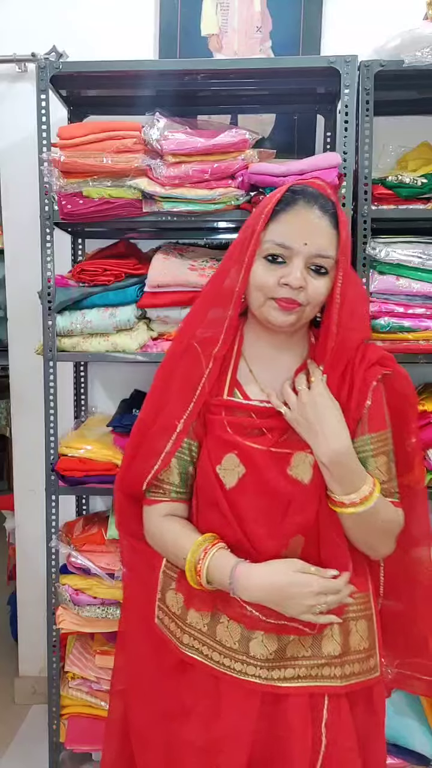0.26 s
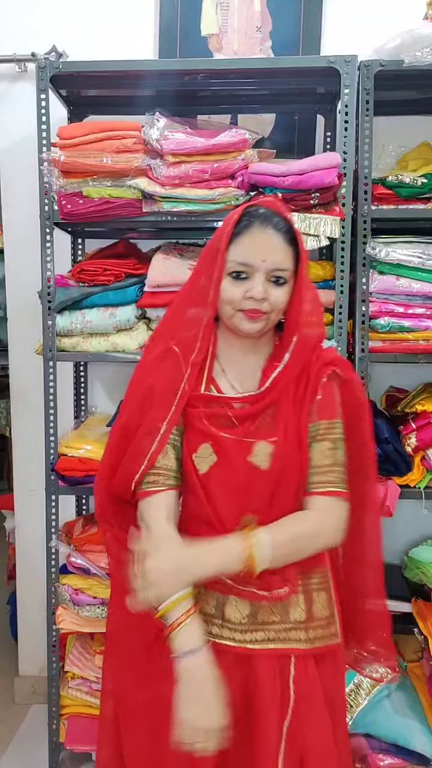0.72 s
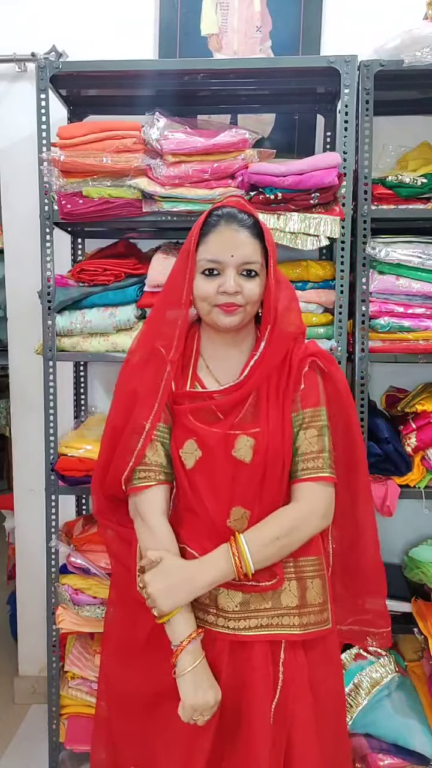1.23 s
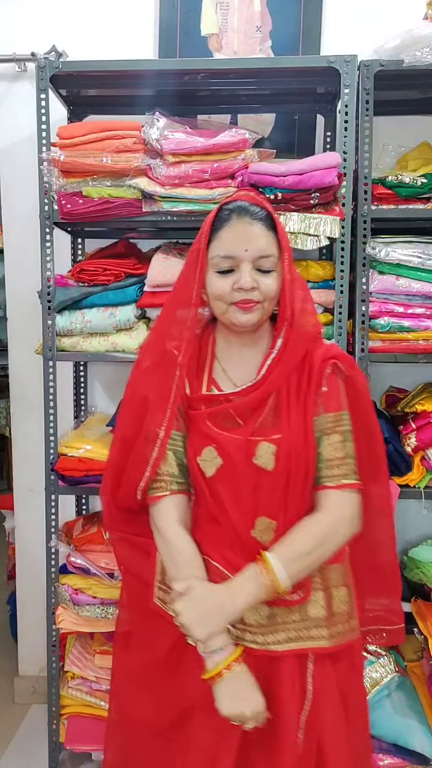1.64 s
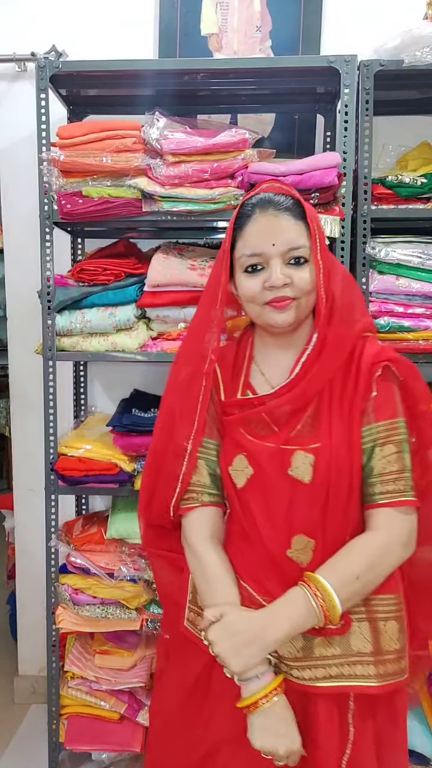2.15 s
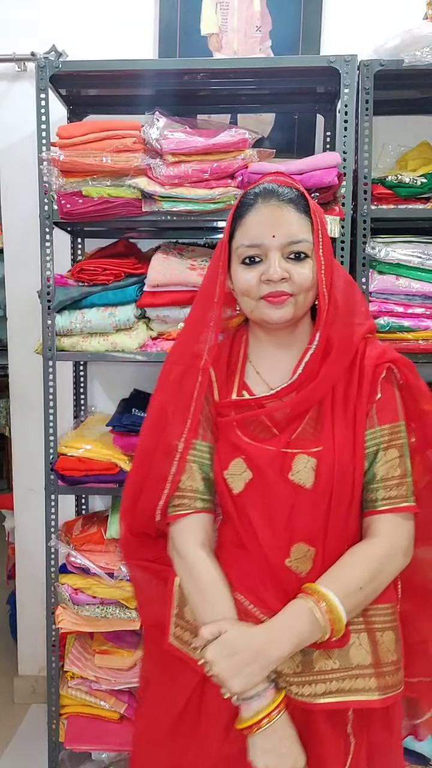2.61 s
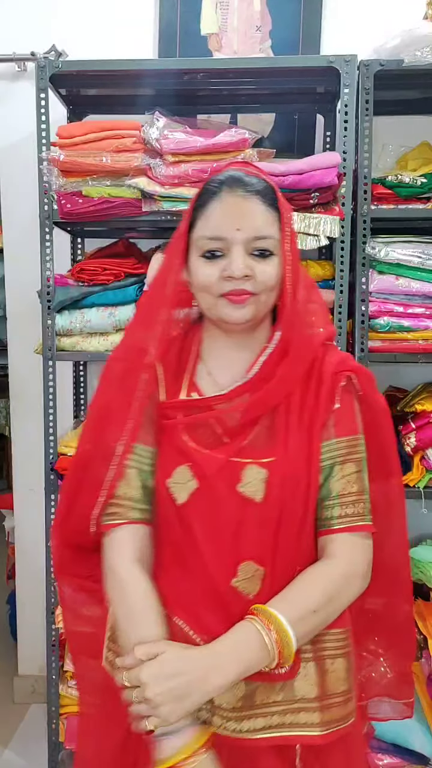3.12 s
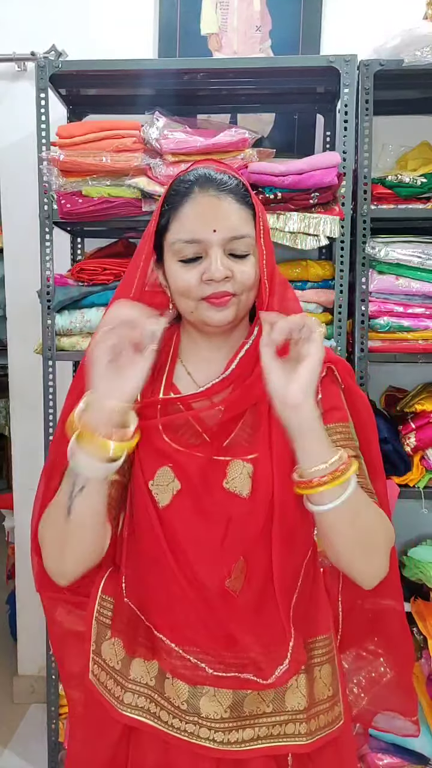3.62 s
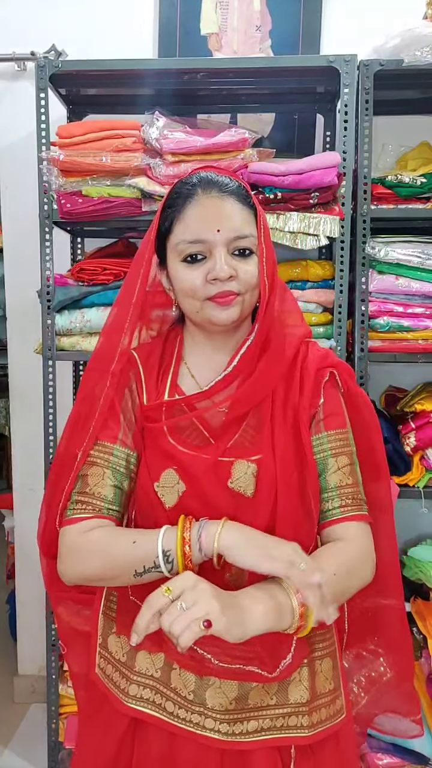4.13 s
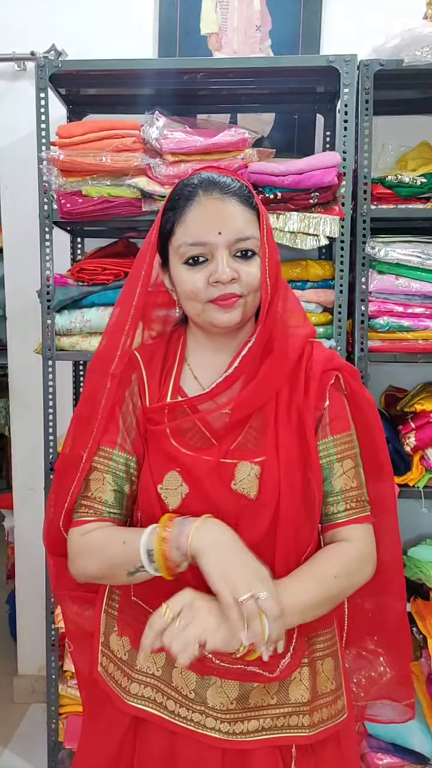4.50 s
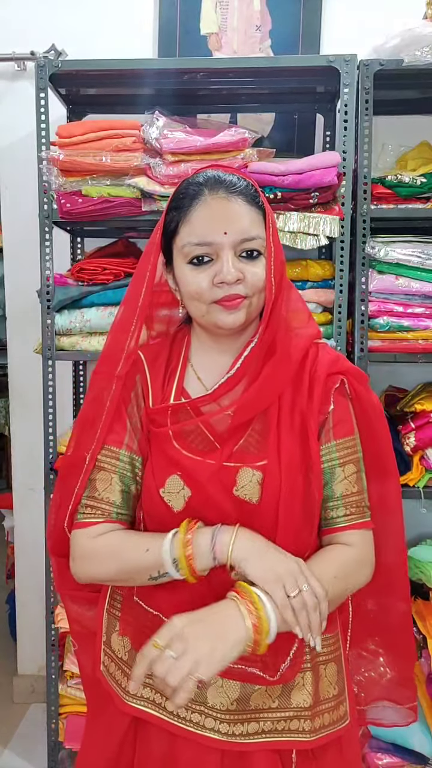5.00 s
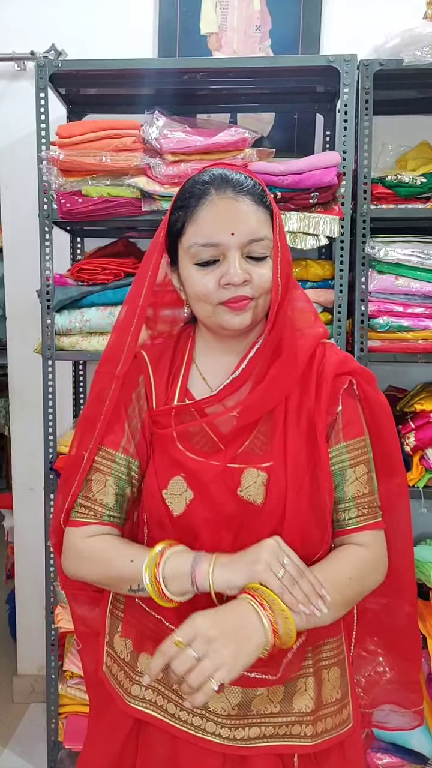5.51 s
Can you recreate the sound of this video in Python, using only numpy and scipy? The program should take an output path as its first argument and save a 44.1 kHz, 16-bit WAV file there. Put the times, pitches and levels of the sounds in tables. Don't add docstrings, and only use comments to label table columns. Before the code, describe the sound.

The input opens from near silence within the first 0.2 seconds, letting in soft room air, faint cloth hiss and a steady low motor hum; the level rises slightly over the first second. A tiny bangle tick comes at 0.53. From 0.75 to 0.92 bangles clack in a quick cluster, strongest near 0.9, with a veil rustling. The hardest, densest clash runs from 1.39 to 1.58, a rattling burst of bright, dry metallic clicks with dull wrist knocks and another cloth sweep. Softer rustling follows near 1.9, then mostly hum and air until a light tick at 3.15. Moderate clacks fall at 3.48 and 3.82, a bright little group at 4.03 to 4.12, another at 4.36 to 4.52 with soft cloth. Sparse clacks come at 4.87, 5.1 and 5.24, with faint ticks at 5.4 and 5.67. The small cloth-lined shop gives short, dark echoes.

```python
import sys
import numpy as np
from scipy import signal
from scipy.io import wavfile
from scipy.ndimage import uniform_filter1d

SR = 44100
rng = np.random.default_rng(int(sys.argv[2]) if len(sys.argv) > 2 else 0)


def wav_record(signal):
    frames = np.transpose(np.atleast_2d(signal))
    bounded = np.clip(frames, -1, 1)
    quanta = np.round(bounded * 32767).astype(np.int16)
    wavfile.write(sys.argv[1], SR, quanta)


def gain_from_decibels(decibels):
    exponent = np.asarray(decibels, float) / 20
    return 10 ** exponent


N = 253575

# (time [s], level [dB])
GAIN = [
    (0, -7),
    (.13, -8),
    (.48, -1),
    (.88, 2),
    (1.5, 1),
    (2.95, -1.5),
    (4.3, 1),
    (4.8, 0),
    (5.75, -.5),
]


def evened(x):
    return x / np.sqrt(np.mean(x ** 2) + 1e-20)


def read(points, hz):
    f, value = np.transpose(points)
    return np.interp(np.log(hz + 1), np.log(f + 1), value)


def follow(rows):
    return np.interp(np.arange(N) / SR, *np.transpose(rows))


def add(mix, s, sound):
    part = mix[round(s * SR):][:len(sound)]
    part += sound[:len(part)]


def noise(spectrum, patchy_db, size):
    frames, hz = N // 512 + 5, np.fft.rfftfreq(2048, 1 / SR)
    real, imaginary, patches = rng.standard_normal((frames, 1025, 3)).T
    patches = uniform_filter1d(patches, size=size, axis=0)
    patches = evened(uniform_filter1d(patches, size=8, axis=1))
    level = gain_from_decibels(read(spectrum, hz)[:, None] + patchy_db * patches)
    z = (real + 1j * imaginary) * level
    return evened(signal.istft(z, nperseg=2048, noverlap=1536)[1][:N])


def room_air():
    # (frequency [Hz], density [dB per Hz])
    air_spectrum = [(15, 7.5), (30, -2), (50, 1), (75, 2), (150, -5.5), (220, 2), (300, -1.5), (420, -3),
                    (600, -7), (750, -8), (1120, -14), (1420, -14.5), (2300, -23.5), (14500, -33)]
    return gain_from_decibels(-64 + follow(GAIN)) * noise(air_spectrum, patchy_db=2.0, size=3)


def veil_hiss():
    # (frequency [Hz], density [dB per Hz])
    hiss_spectrum = [(1180, -34), (2000, -12.5), (2830, -12), (3070, -13), (3420, -14.5), (5710, -13),
                     (7810, 3), (13300, -19), (14400, -27)]
    # (loudest time [s], half length [s], level [dB])
    sweeps = [
        (0.345, 0.077, -69.5),
        (0.774, 0.028, -59),
        (0.918, 0.093, -61),
        (1.247, .15, -78),
        (1.573, 0.096, -61.5),
        (1.923, 0.059, -63),
        (2.05, 0.05, -75),
        (4.02, .1, -74),
        (4.433, .08, -64.5),
    ]
    t = np.arange(N) / SR
    power = gain_from_decibels(2 * (-75 + 0.89 * follow(GAIN)))
    for s, half_s, db in sweeps:
        power = power + gain_from_decibels(2 * db) * np.exp(-((t - s) / half_s) ** 2)
    return np.sqrt(power) * noise(hiss_spectrum, patchy_db=2.5, size=30)


def motor_hum():
    # (frequency [Hz], level [dB], time in step with it [s])
    neighbours = [(98.245, -73.5, 3.058), (100.07, -77.4, 3.101)]
    shaft_hz = 48.552
    t = np.arange(N) / SR
    turn = 2 * np.pi * t
    rise = 1 - np.exp(-np.maximum(t - 0.11, 0) / .07)
    motor = gain_from_decibels(-54) * np.cos(shaft_hz * turn) * rise
    motor = motor + gain_from_decibels(-68.4) * np.cos(2 * shaft_hz * turn)
    for hz, db, s in neighbours:
        motor = motor + gain_from_decibels(db) * np.cos(hz * turn - 2 * np.pi * (hz - 2 * shaft_hz) * s)
    return np.sqrt(2) * motor * gain_from_decibels(0.63 * follow(GAIN))


def fan_tones():
    # (frequency [Hz], level [dB])
    lines = [(20.1, -75), (23.7, -77), (59.3, -75.5), (82.5, -81), (119.5, -86.5), (143, -82.5),
             (175.6, -83.5), (196, -85), (300, -79), (1405, -88.5), (387.4, -79.5), (240, -81.5),
             (281, -80.5)]
    turn = 2 * np.pi * np.arange(N) / SR
    tones = sum(gain_from_decibels(db) * np.sin(hz * turn + 2 * np.pi * rng.random()) for hz, db in lines)
    return np.sqrt(2) * tones * gain_from_decibels(follow(GAIN) + 0.9)


def settle():
    start_s, takes_s, bend = 0.13, 0.39, 1.48
    since = np.maximum(np.arange(N) / SR - start_s, 0) / takes_s
    return gain_from_decibels(-40) * np.sin(2 * np.pi * (1 - np.exp(-since ** bend)))


def rings(t, hz, spread, t60, db):
    place, phase = rng.random((2, 7, 1)) - .5
    pitch = hz + spread * (np.linspace(-1, 1, 7)[:, None] + .3 * place)
    group = gain_from_decibels(-60 * t / t60) * np.sin(2 * np.pi * (pitch * t + .6 * phase)).sum(0)
    group = group * np.sin(np.pi / 2 * np.minimum(t / .0006, 1)) ** 2
    return gain_from_decibels(db) * group / np.sqrt(np.mean(group[:130] ** 2))


def contact(main_hz, low_db, middle_db, high_db, groups):
    # (spread [Hz], decay t60 [s], level [dB])
    main_ring = (280, .014, 0)
    t = np.arange(1200) / SR
    sound = rings(t, main_hz, *main_ring)
    sound = sound + rings(t, 2060, 700, 0.0064, -13 + low_db)
    for group, group_db in zip(groups, (low_db, middle_db, high_db, high_db)):
        sound = sound + gain_from_decibels(group_db) * rings(t, *group)
    return sound


def clack(blow_db, *colour):
    rebound_db, stack_db = -11, -1.32
    sound = np.zeros(1500)
    add(sound, 0, contact(*colour))
    for k in (1, 2):
        add(sound, k * rng.uniform(0.0011, 0.002), gain_from_decibels(k * rebound_db) * contact(*colour))
    return gain_from_decibels(blow_db + stack_db) * sound


def shop():
    # (delay [s], level [dB])
    echoes = [
        (.0085, -11),
        (0.0155, -19.5),
        (.025, -23),
        (0.033, -21),
    ]
    # (frequency [Hz], decay t60 [s])
    decay = [(1500, 0.43), (4000, 0.26), (8000, 0.23), (14000, 0.19)]
    size = SR // 2
    starts = np.arange(0, size - 20, 20)
    at = starts + rng.integers(0, 20, len(starts))
    taps = np.zeros(size)
    taps[at] = rng.choice([-1., 1.], len(at)) * gain_from_decibels(4.0 * rng.standard_normal(len(at)))
    hz, t, z = signal.stft(taps, SR, nperseg=128)
    fading = gain_from_decibels(-60 * t / read(decay, hz)[:, None])
    tail = signal.istft(z * fading, SR, nperseg=128)[1][:size]
    tail *= np.clip((np.arange(size) / SR - .003) / 0.00597, 0, 1)
    path = gain_from_decibels(-5) * tail / np.linalg.norm(tail)
    path[0] = 1
    for s, db in echoes:
        path[round(s * rng.uniform(.95, 1.05) * SR)] += gain_from_decibels(db + 1.2 * rng.standard_normal())
    return path


def bangles():
    # (time [s], blow [dB])
    touches = [(0.183, -75), (0.711, -56.5), (0.7474, -52), (0.769, -42), (1.715, -68), (2.138, -62),
               (2.278, -70), (2.288, -68.5), (3.184, -60), (3.459, -73), (3.577, -61), (3.612, -55),
               (4.031, -66), (4.354, -53.5), (5.586, -71), (5.611, -65)]
    # (time [s], blow [dB])
    rattle = [(1.4018, -35), (1.432, -40), (1.448, -40), (1.474, -38), (1.533, -40), (1.556, -39),
              (1.579, -40.5)]
    # (main ring [Hz], low, middle and high ring groups [dB])
    touch_colour = (8051, -10.5, -9, -7.5)
    # (time [s], blow [dB], low, middle and high ring groups against the blow [dB])
    wide_stack = [(0.779, -45, -23, 1, -14), (0.8486, -29, -17, -21, -17), (0.9065, -40, -25, -5, -23),
                  (1.4138, -31, -16, -7, -17), (1.5094, -31.5, -22, -26, -27.5), (1.542, -29, -23, -4, -9),
                  (3.2157, -56.5, -9, 2.5, -3), (3.4751, -31, -15.5, -1, -9), (3.601, -48, -10.5, 0.5, -10),
                  (3.8184, -34.5, -15.5, -3.5, -8), (3.832, -40, -27, -4.5, -14),
                  (4.0277, -61.5, -2.5, 7, -17), (4.1203, -50, -10, -8, -19),
                  (4.4684, -32.5, -15.5, -18, -15), (4.516, -42, -17, 0, -16),
                  (5.098, -32.5, -11.5, -12, -13.5), (5.672, -57, -7.5, 4, -1.5)]
    # (time [s], blow [dB], low, middle, high [dB])
    narrow_stack = [(0.765, -40, -15.5, -5, -1), (0.893, -21, -19, -17, -15.5),
                    (0.9172, -43, -34.5, -31, -29), (1.394, -24, -27.5, -2.5, -6.5),
                    (1.3966, -22, -23, -23, -10), (1.407, -24.5, -17.5, -3.5, -9),
                    (1.4593, -18.5, -20.5, -17, -13), (1.4915, -35, -15.5, -6.5, -8.5),
                    (1.5442, -32, -15.5, -26, -13), (3.5857, -58, -3, -15, -16), (3.6398, -60, -5, -3, -10),
                    (3.686, -58.5, -4.5, 4, -17), (4.1121, -47, -8, -5, 1), (4.3571, -44, -15.5, -12, -27),
                    (4.3768, -50, -6, -6, -9), (4.4268, -70.5, 8, -5, -10)]
    # (time [s], blow [dB], low, middle, high [dB])
    thin_stack = [
        (0.5293, -52, -18, -5.5, -2.5),
        (3.1469, -44.5, -21.5, -5.5, -4.5),
        (4.0818, -35.5, -14, 0.5, 2.5),
        (4.1, -37, -9.5, -2.5, -14),
        (4.873, -45, -24.5, -5.5, 0.5),
        (5.2433, -38.5, -17, -7, -0.5),
        (5.405, -51, -12, -4, 2.5),
    ]
    # (centre [Hz], spread [Hz], decay t60 [s], level [dB])
    wide_rings = [(4450, 900, .005, -.5), (6900, 400, .008, -2), (10100, 450, .009, -2),
                  (12500, 900, .004, -14)]
    # (centre [Hz], spread [Hz], decay t60 [s], level [dB])
    narrow_rings = [(4450, 900, .005, -.5), (6900, 400, .008, -2), (10100, 450, .009, -2),
                    (12300, 1000, .005, -7.5)]
    # (centre [Hz], spread [Hz], decay t60 [s], level [dB])
    thin_rings = [(3900, 500, .007, -.5), (6350, 280, .01, -2), (9850, 400, .009, -2),
                  (13300, 500, .005, -10.5)]

    blows = [(s, db, *touch_colour, narrow_rings) for s, db in [*touches, *rattle]]
    stacks = [(wide_stack, 7755, wide_rings), (narrow_stack, 8123, narrow_rings), (thin_stack, 8130, thin_rings)]
    for stack, main_hz, groups in stacks:
        for s, db, *groups_db in stack:
            blows.append((s, db, main_hz, *groups_db, groups))
    mix = np.zeros(N)
    for s, *blow in blows:
        add(mix, s, signal.fftconvolve(clack(*blow), shop()))
    return mix


def scene():
    return (room_air() + veil_hiss() + motor_hum() + fan_tones() + bangles())[None]


def top_cut(x):
    return signal.sosfilt(signal.butter(12, 14550, fs=SR, output="sos"), x)


def record(dry):
    t = np.arange(N) / SR
    bass = signal.sosfiltfilt(signal.butter(4, 130, fs=SR, output="sos"), dry)
    held_back = np.clip(1 - (t - 0.11) / 0.081, 0, .7)
    opening = np.clip((t - 0.023) / 0.019, 0, 1)
    opened = (dry - bass * held_back) * opening
    low_pass = signal.firwin(191, 13950, window=("kaiser", 7), fs=SR)
    limited = signal.oaconvolve(opened, low_pass[None], "same")
    mix = limited + uniform_filter1d(settle(), size=1200)
    return top_cut(mix)


dry = scene()
out = record(dry)
wav_record(out)
```